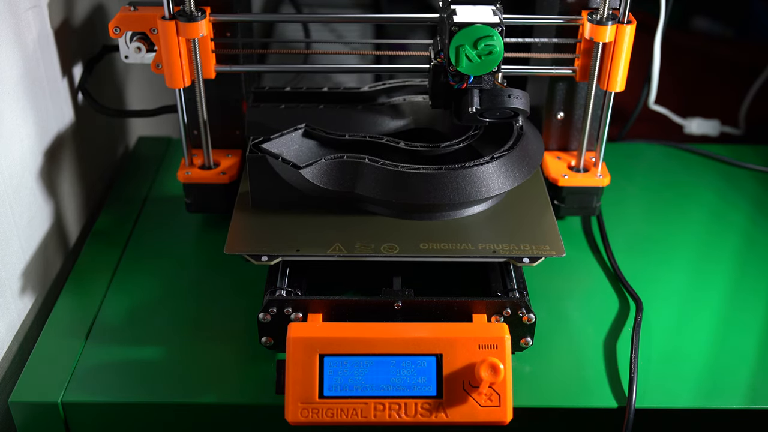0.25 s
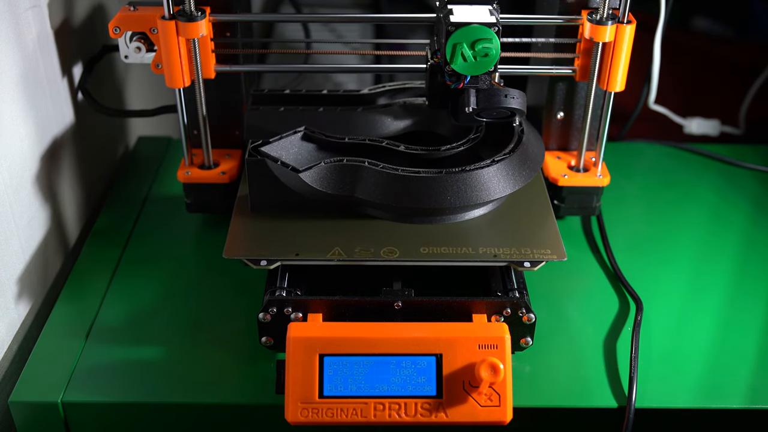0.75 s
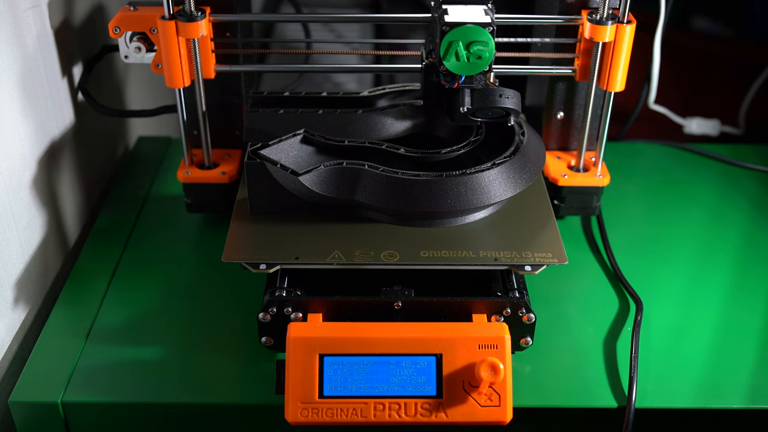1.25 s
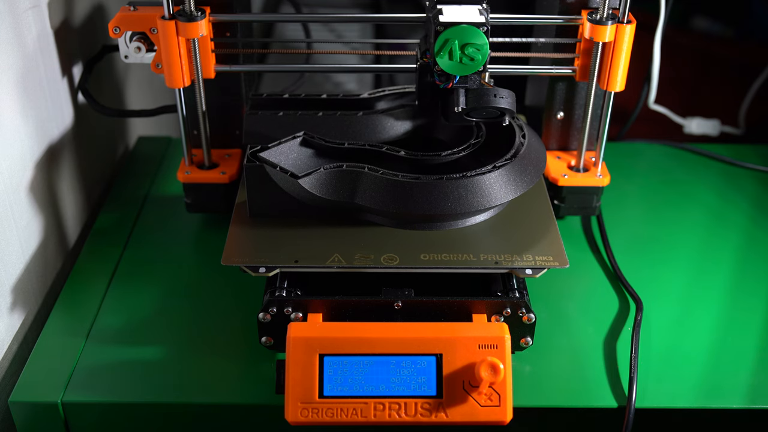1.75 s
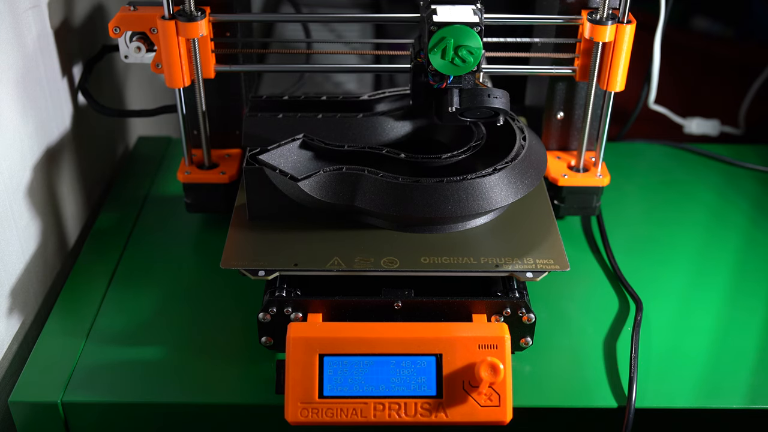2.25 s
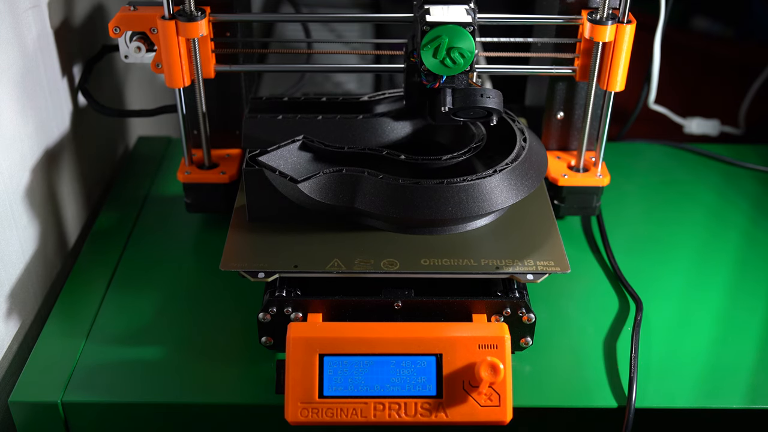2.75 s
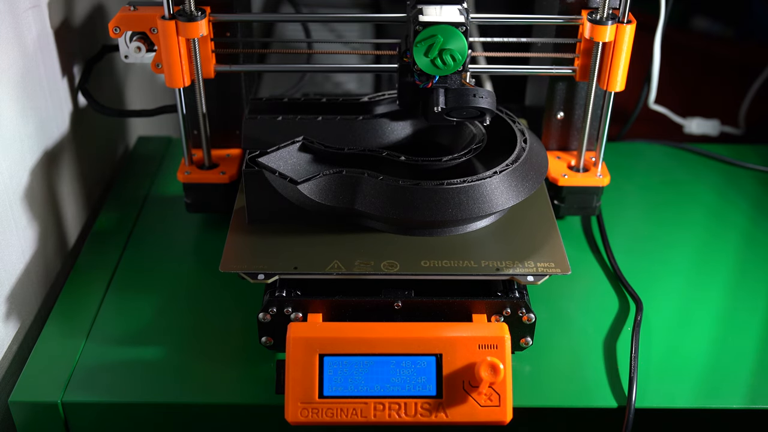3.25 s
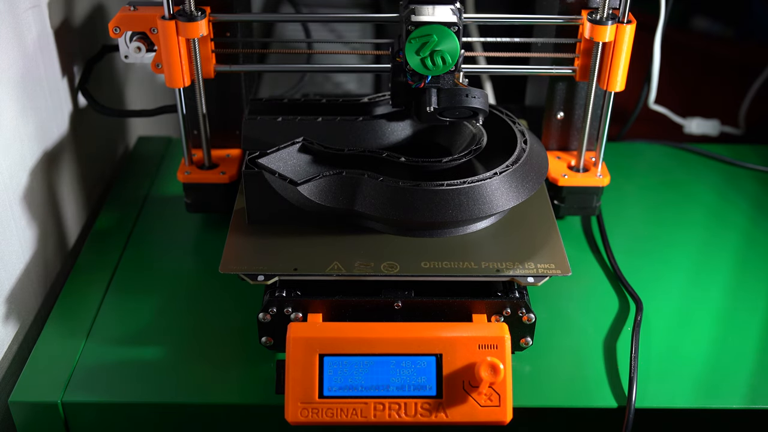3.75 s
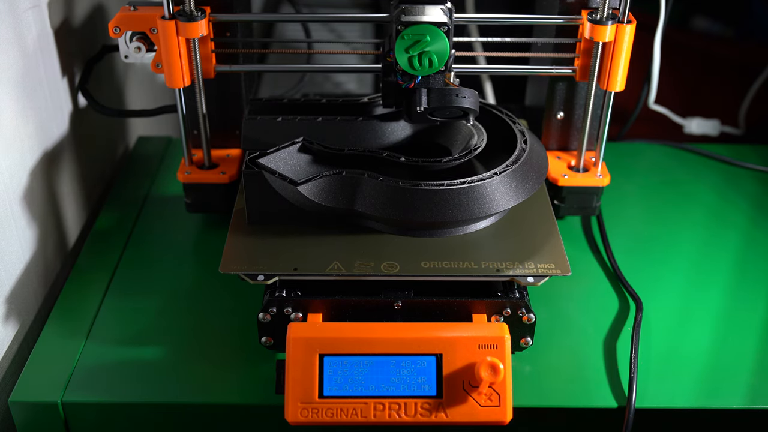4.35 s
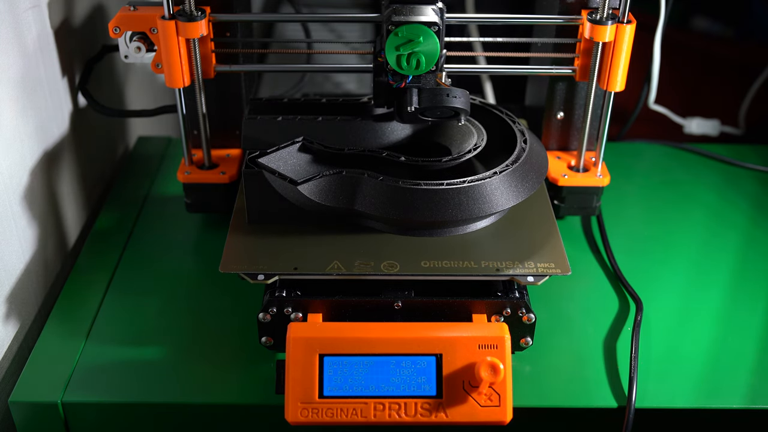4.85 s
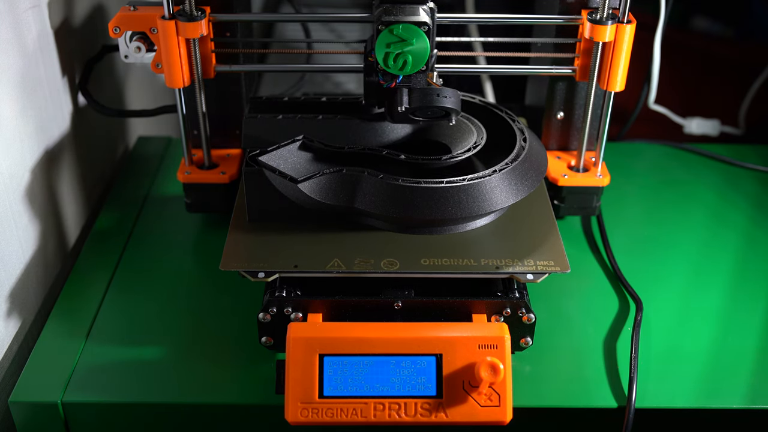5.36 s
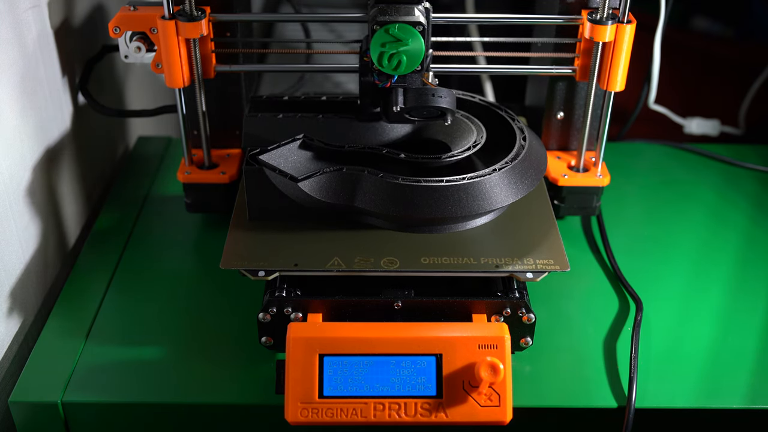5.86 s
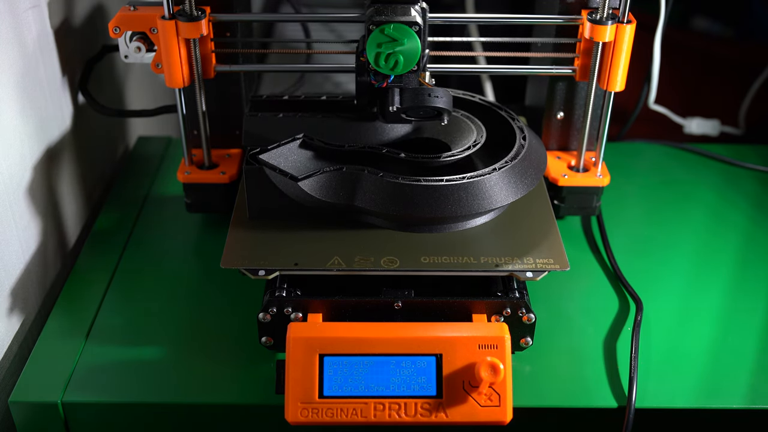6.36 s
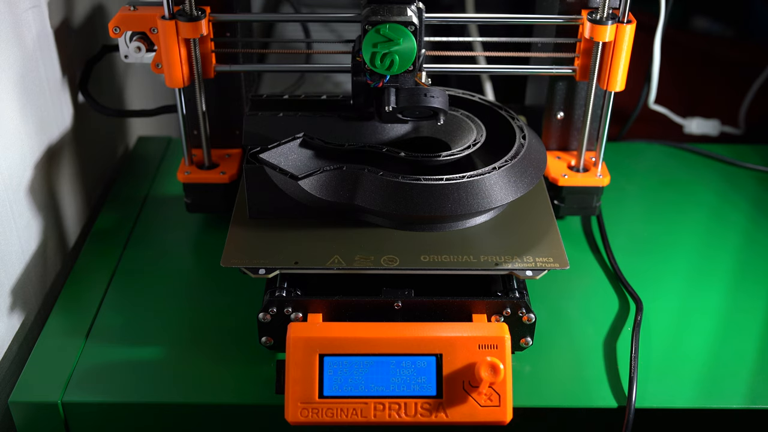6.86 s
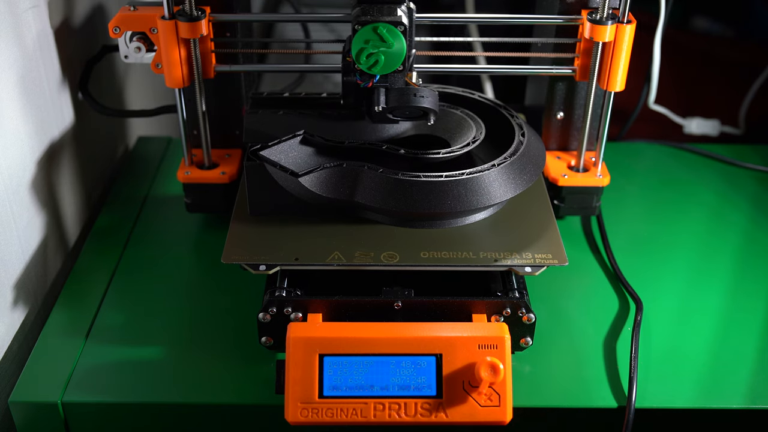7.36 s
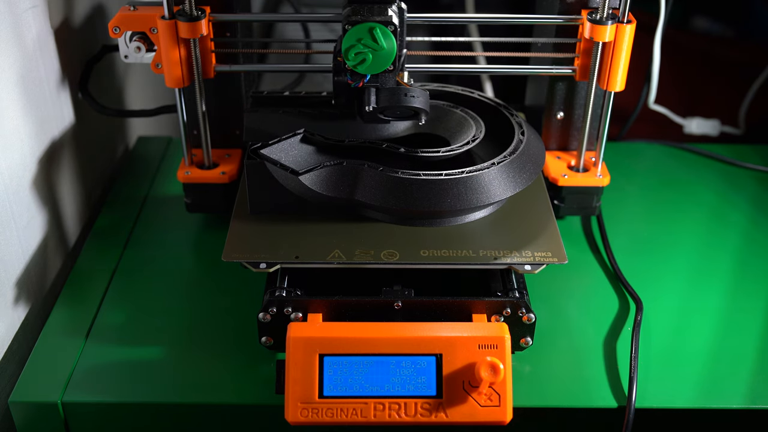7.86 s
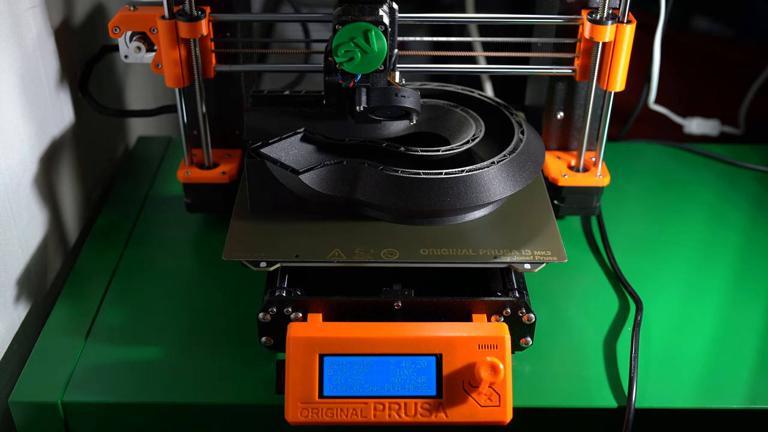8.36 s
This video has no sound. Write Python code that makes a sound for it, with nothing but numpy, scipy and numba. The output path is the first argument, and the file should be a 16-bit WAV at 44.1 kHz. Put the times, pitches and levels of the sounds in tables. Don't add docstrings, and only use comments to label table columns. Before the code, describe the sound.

A desktop 3D printer works on a table, heard very close and nearly dry from a microphone on the same surface. Rapid zigzag strokes make a fluttering buzz and whine with ticks at each turn and low booming vibration. The strokes slow, then irregular hops bring rising and falling chirps, knocks and thumps before faster zigzags resume. Small fans blow steadily beneath.

```python
import sys
import numpy as np
from scipy import signal
from scipy.fft import rfft, irfft, next_fast_len
from scipy.io import wavfile
from scipy.ndimage import uniform_filter1d
from numba import njit

SR = 44100
rng = np.random.default_rng(int(sys.argv[2]) if len(sys.argv) > 2 else 0)


def wav_out(sig):
    wavfile.write(sys.argv[1], SR, np.round(np.clip(np.atleast_2d(sig).T, -1, 1) * 32767).astype(np.int16))


def attenuation_scalar(level_db):
    decades = np.asarray(level_db, float) / 20
    return 10 ** decades


N = 379701
TIME = np.arange(N) / SR


def set_rms(x, db):
    return x * attenuation_scalar(db) / np.sqrt(np.mean(x ** 2))


def noise():
    return rng.standard_normal(N)


def curves(table):
    s, *columns = np.transpose(table)
    return [np.interp(TIME, s, column) for column in columns]


@njit
def moving_band(x, hz, width):
    y, band_state, low_state = np.empty(len(x)), 0., 0.
    for i in range(len(x)):
        g, damping = np.tan(np.pi * hz[i] / SR), width / hz[i]
        v = (band_state + g * (x[i] - low_state)) / (1 + g * (g + damping))
        band_state = 2 * v - band_state
        low_state = low_state + 2 * g * v
        y[i] = damping * v
    return y


def band(x, hz, width):
    return signal.lfilter(*signal.iirpeak(hz, hz / width, fs=SR), x)


def body(x, modes):
    return sum((-1) ** k * attenuation_scalar(db) * band(x, hz, width) for k, (hz, width, db) in enumerate(modes))


def walk(rate):
    hold = int(SR / rate)
    steps = np.repeat(rng.standard_normal(N // hold + 1), hold)
    return 1.19 * uniform_filter1d(steps, hold)[:N]


def clicks(s, size):
    out = np.zeros(N)
    i = np.maximum(np.asarray(s) * SR, 0).astype(int)
    np.add.at(out, i[i < N], np.asarray(size)[i < N])
    return out


def puffs(s, size, length):
    return signal.lfilter([1], [1, -np.exp(-1 / (length * SR))], clicks(s, size)) * noise()


def ramp(mid, half):
    return np.clip(1 - np.abs(TIME - mid) / half, 0, 1)


def bumps(events, width_s):
    return sum(db * np.exp(-((TIME - at) / width_s) ** 2) for at, db in events)


# (frequency [Hz], density [dB per Hz])
AIR = [(53, -6), (90, -20.5), (119, -5.5), (151, -21), (214, -12.5), (359, -29.5), (426, -5), (685, -89),
       (780, -73), (907, -31), (1250, -30.5), (1730, -40), (3610, -44), (7060, -52.5), (15700, -46)]
# (frequency [Hz], width [Hz], level [dB])
SHROUD = [(1373, 280, 1.5), (2560, 740, -1.5), (3566, 840, -2), (5550, 95, -27), (6070, 78, -19.5),
          (8090, 220, -17.5)]
# (frequency [Hz], width [Hz], level [dB])
BLADE_LINES = [(3390, 25, -70.5), (3853, 9.3, -66.5), (4185, 4.6, -72), (4250, 6.7, -70.5),
               (2180, 71, -62.5), (1050, 150, -63), (1197, 140, -57.5)]


def fans():
    hz, db = np.transpose(AIR)
    size = next_fast_len(N)
    f = np.maximum(np.fft.rfftfreq(size, 1 / SR), 1)
    air = irfft(rfft(noise(), size) * attenuation_scalar(np.interp(np.log(f), np.log(hz), db)), size)[:N]
    air = set_rms(air, 0) * 2.09
    shroud = body(noise() * attenuation_scalar(0.8 * walk(30)), SHROUD)
    lines = sum(set_rms(band(noise(), hz, width), db) for hz, width, db in BLADE_LINES)
    return attenuation_scalar(-44.5) * (air + set_rms(shroud, -5)) + lines


# (frequency [Hz], width [Hz], level at start [dB], level at end [dB])
TRAVEL = [(2756, 320, -53.5, -72), (2350, 230, -69, -64), (3330, 290, -71.5, -57.5), (3926, 360, -73, -60),
          (5440, 150, -71, -86), (6060, 95, -73, -79)]


def head_travel():
    out = 0
    for hz, width, start_db, end_db in TRAVEL:
        tone = band(band(noise(), hz, width), hz, width)
        out = out + attenuation_scalar(np.linspace(start_db, end_db, N)) * set_rms(tone, 0)
    return out


# (zigzag number, time for its four turns [s])
GAP_ONE = [(0, .1232), (2, .1164), (8, .1085), (13, .1038), (16, .1059), (24, .1172), (30, .1293),
           (36, .1476), (41, .163), (42, .186), (43, .199)]
# (zigzag number, time for its four turns [s])
GAP_TWO = [
    (0, .1941),
    (2, .1857),
    (3, .167),
    (8, .1577),
]
RUN_STARTS = (.0032, 7.2045)


def zigzags():
    runs = []
    for start, gap in zip(RUN_STARTS, (GAP_ONE, GAP_TWO)):
        lasts = np.interp(np.arange(gap[-1][0] + 1), *np.transpose(gap))
        runs.append(start + np.r_[0, np.cumsum(lasts)])
    return runs


def progress():
    return sum(np.interp(TIME, starts, np.arange(len(starts))) for starts in zigzags())


TURN_PLACE = [
    (-.032, .243, .472, .748),
    (-.032, .262, .512, .755),
]


def turns():
    rows = []
    for starts, places in zip(zigzags(), TURN_PLACE):
        for a, b in zip(starts, starts[1:]):
            slow = np.clip((b - a - 0.178) / 0.028, 0, 1) * (a < RUN_STARTS[1])
            rows += [(a + place * (b - a), -49 - 7 * slow, k) for k, place in enumerate(places)]
    s, tick_db, place = np.transpose(rows)
    return s, tick_db, place.astype(int)


# (time [s], half length [s], whine [dB], lowest driver hiss [Hz], driver hiss [dB])
HOPS = [(5.655, 0.054, -28.5, 11870, -40), (5.789, 0.017, -53, 13000, -35), (5.854, 0.033, -42, 13200, -40),
        (5.946, 0.052, -58, 14300, -44), (6.111, 0.054, -31.5, 12960, -40), (6.238, 0.02, -49, 12600, -40),
        (6.302, 0.035, -40, 13530, -37), (6.398, 0.033, -42, 14200, -41), (6.569, 0.055, -32.5, 12160, -42),
        (6.697, 0.022, -54, 13000, -40), (6.758, 0.02, -40, 12600, -39), (6.858, 0.017, -50, 13600, -40),
        (7, 0.036, -54, 14270, -47), (7.109, .02, -61, 12240, -42), (7.174, 0.023, -38, 13530, -42),
        (7.21, 0.021, -32.5, 14000, -44)]
# (time [s], level [dB])
DRIVER = [(0, -53.5), (1.4, -52.5), (3, -53.5), (4.6, -54.5), (5.5, -53.5), (5.7, -53), (7.1, -54.5),
          (7.3, -53), (8.61, -53)]
RESTS = [5.57, 5.74, 6.19, 6.65, 6.94, 7.07]


def driver():
    steady = 0
    for hz, width, db in ((12600, 520, -5), (13900, 400, 0), (15160, 2000, 3.5), (15450, 560, 3)):
        steady = steady + attenuation_scalar(db + 3.3 * walk(110)) * band(noise(), hz, width)
    dip, gain = np.zeros(N), np.zeros(N)
    for mid, half, _, low_hz, db in HOPS:
        speed = ramp(mid, half)
        dip = dip + (16000 - low_hz) * speed ** 3.6
        gain = gain + attenuation_scalar(db) * speed ** 0.68
    hiss, swept = noise(), 0
    for depth in (.95, .6, .3):
        hz = 16000 - depth * dip
        swept = swept + moving_band(moving_band(hiss, hz, 1800.), hz, 1800.)
    rest_db = bumps([(at, -9.5) for at in RESTS], 0.026)
    return attenuation_scalar(curves(DRIVER)[0] + rest_db) * set_rms(steady, 0.83) + 2.0 * gain * swept


def knocks(events, modes, sharp, rattle, rattle_s, soft_s):
    s, db = np.transpose(events)
    blow = clicks(s, sharp * attenuation_scalar(db)) + puffs(s - .5 * rattle_s, rattle * attenuation_scalar(db), rattle_s)
    t = TIME[:SR // 4]
    ring = sum(attenuation_scalar(db) * np.exp(-np.log(1000) * t / t60) * np.sin(2 * np.pi * hz * t) for hz, db, t60 in modes)
    return signal.fftconvolve(blow, ring * (1 - np.exp(-t / soft_s)))[:N]


# (time [s], peak [dB])
RELEASE = [(5.7107, -33.5), (6.0028, -39), (6.02, -40), (6.1678, -32), (6.4018, -43), (6.6293, -31.5),
           (7.041, -35)]
# (frequency [Hz], level [dB], t60 [s])
RELEASE_MODES = [(1280, 2.5, 0.025), (1517, -8, 0.053), (1579, -9, 0.03), (1084, -10, 0.072),
                 (1930, -8, 0.027), (2600, -18, .008), (3620, -1.5, 0.011)]


def filament_release():
    return knocks(RELEASE, RELEASE_MODES, sharp=1.3, rattle=0.044, rattle_s=0.0032, soft_s=0.00021)


# (time [s], peak [dB])
GRIP = [(5.802, -34), (6.263, -28), (6.722, -30), (7.136, -28.5)]
# (frequency [Hz], level [dB], t60 [s])
GRIP_MODES = [(2496, -4.5, 0.08), (2590, -7, 0.044), (2230, -3, 0.036), (2080, 0, 0.02), (1330, -8, 0.05),
              (2930, -5, 0.023), (3540, 0, 0.017)]


def filament_grip():
    return knocks(GRIP, GRIP_MODES, sharp=1.6, rattle=0.034, rattle_s=0.0082, soft_s=0.0044)


# (frequency [Hz], width [Hz], level [dB])
BEARINGS = [(2710, 1500, -5), (2604, 477, 9.5), (4080, 250, -0.5), (5730, 380, -0.5), (5860, 290, 0),
            (7680, 960, -3), (8900, 3900, -5.5), (11050, 3600, -6.5)]


def bearing_ticks():
    s, tick_db, _ = turns()
    size = attenuation_scalar(tick_db + 16.5 + 1.4 * rng.standard_normal(len(s)))
    tick = 0.87 * puffs(s - .001, size, 0.0023) + 0.72 * clicks(s, size)
    shiver = puffs(s - .001, size, 0.008)
    return body(tick, BEARINGS[2:]) + 0.6 * body(shiver, BEARINGS[:2])


# (time [s], peak [dB], length [s])
SCUFFS = [(2.6329, -27, 0.0062), (2.677, -27.5, 0.007), (3.743, -32, 0.005), (5.44, -36, 0.0067),
          (5.807, -30.5, 0.0063), (5.914, -41, 0.005), (6.26, -31, 0.011), (6.37, -36, 0.0041),
          (6.725, -31, 0.005), (6.826, -41, 0.0081), (7.14, -29.5, 0.0057)]


def nozzle_scuffs():
    scrape, out = band(noise(), 4300, 8800), 0
    for at, db, length in SCUFFS:
        age = np.maximum(TIME - at, 0) / max(length, .001)
        out = out + attenuation_scalar(db - 5.0) * np.sqrt(age) * np.exp(-age) * scrape
    ping = np.exp(-((TIME - 2.636) / 0.0013) ** 2) * np.sin(2 * np.pi * 3950 * TIME)
    return out + attenuation_scalar(-35) * ping


# (frequency [Hz], width [Hz], level [dB])
FRAME = [(301, 29.3, 0.5), (338.8, 25.6, 3), (419.4, 39, 2), (490.7, 57.6, -3.5), (597.5, 123, -7.5),
         (662, 304, -12), (774.6, 54, -10.5), (1053, 106, -19), (1353, 300, -21.5)]


def whine(step_hz, gain):
    phase = 2 * np.pi * np.cumsum(step_hz * (1 + 0.0402 * walk(150))) / SR
    tone = gain * (np.sin(phase) + 0.58 * np.sin(2 * phase) + 0.32 * np.sin(3 * phase))
    plate = band(band(tone, 784, 32), 784, 160)
    return body(tone, FRAME) + attenuation_scalar(-9) * plate


# (time [s], bed motor share [0-1], whine over buzz [dB], step rate at mid stroke [Hz])
STROKES = [(0, 0.55, -10.5, 430), (.55, 0.44, -9, 431), (.9, 0.41, -12, 446.6), (1.25, 0.46, -12.5, 480.5),
           (1.7, 0.54, -0.5, 558), (2.3, 0.7, 1, 545.7), (2.6, 0.44, -6.5, 478.6), (3.1, 0.13, -13, 449.7),
           (3.6, 0.11, -13, 423), (4.3, 0.55, -10.5, 419.4), (4.9, 0.16, -15, 426.6), (5.4, 0.2, -6, 444.6),
           (7.2, 0.07, -5, 500), (7.6, 0.23, -4, 523.7), (8.0, 0.49, -6, 471.7), (8.61, 0.4, -19.5, 455)]


def long_strokes():
    _, whine_db, top_hz = curves(STROKES)
    count = progress()
    speed = np.clip(1 - np.abs((2 * count + .36) % 1 - .5) / .4, 0, 1) * (np.gradient(count) > 0)
    return whine(top_hz * speed ** .7, attenuation_scalar(whine_db + 1.5 * walk(18)) * speed ** .8)


# (time [s], half length [s], top step rate [Hz], whine [dB])
SLOW_STROKES = [(5.238, 0.033, 427, -27.5), (5.345, 0.044, 482.4, -30.5), (5.503, 0.037, 476, -30.5),
                (5.898, 0.016, 426.7, -34.5), (6.007, .03, 370.1, -32.5), (6.178, 0.037, 399, -39),
                (6.5, .03, 399.5, -34.5), (6.64, .03, 342, -35), (6.808, 0.016, 448.7, -32),
                (7.342, .025, 441.5, -33), (7.41, .035, 500, -31), (7.519, 0.033, 477, -29.5),
                (7.6, 0.029, 480, -34)]


def slow_strokes():
    hz, gain = np.zeros(N), np.zeros(N)
    for mid, half, top_hz, db in SLOW_STROKES:
        speed = ramp(mid, half)
        hz = hz + top_hz * speed ** .25
        gain = gain + attenuation_scalar(db + 6) * speed ** 1.2
    return whine(hz, gain)


def hop_moves():
    hz, gain = np.zeros(N), np.zeros(N)
    for mid, half, db, *_ in HOPS:
        speed = ramp(mid, half)
        hz = hz + max(9500 * half, 310) * speed ** 0.4
        gain = gain + attenuation_scalar(db + 5.5) * np.sqrt(speed)
    return hz, gain


# (time [s], frame level [dB], base level [dB])
BUZZ = [(0, -36, -36.5), (.5, -37, -37.5), (.62, -32.5, -31.5), (.96, -36.5, -40.5), (1.36, -35, -30),
        (1.5, -33.5, -37), (1.9, -26, -30.5), (2.3, -26.5, -39), (2.54, -30.5, -30), (2.61, -40.5, -45),
        (2.71, -31, -37), (2.95, -33.5, -37.5), (3.14, -39, -43.5), (5.04, -37.5, -38.5), (5.5, -35, -34),
        (7.12, -34.5, -36.5), (7.35, -29.5, -36), (8.61, -41, -40.5)]
# (frequency [Hz], width [Hz], level [dB])
BASE = [(199.4, 9.7, -6.5), (245.6, 16.3, -4)]


def motors():
    frame_db, base_db = curves(BUZZ)
    whine_db = curves(STROKES)[1]
    s = turns()[0]
    jolts = puffs(s, 1.76 * attenuation_scalar(3.6 * rng.standard_normal(len(s))), 0.005)
    belts = attenuation_scalar(1.36 * walk(40)) * noise() + jolts
    in_frame, in_base = body(belts, FRAME), body(belts, BASE)
    out = attenuation_scalar(frame_db) * (2.72 * long_strokes() + attenuation_scalar(-.6 * whine_db) * set_rms(in_frame, -7.5))
    out = out + attenuation_scalar(base_db) * set_rms(in_base, -2.5)
    rattle = attenuation_scalar(-3) * set_rms(in_frame, -5) + attenuation_scalar(-9.5) * set_rms(in_base, -13)
    rattle = rattle + set_rms(band(band(belts, 1130, 580), 1120, 776), -16)
    hop_hz, hop_gain = hop_moves()
    rattle = uniform_filter1d(hop_gain, int(0.057 * SR)) * rattle
    return out + slow_strokes() + whine(hop_hz, hop_gain) + rattle


HEAD_PULL = (0.56, 0.77, 0.51, 0.53)
BED_PULL = (0.0049, -0.97, 0.12, -0.56)
# (time [s], jolt [share of a motor's pull])
EVEN = [(0, -0.18), (2.2, 0.2), (2.6, -0.13), (3.6, -0.61), (4.3, -0.64), (5.4, -0.6), (7.2, -0.3),
        (8.0, -0.59), (8.61, 0.54)]
# (frequency [Hz], width [Hz], level [dB])
TABLE = [(51.35, 12.5, 2), (59.2, 16.5, 1.5), (69.5, 8.16, -3)]
# (time [s], boom [dB], throb once a zigzag [dB]: above 0 at its start, below 0 at its middle)
SHAKE = [(0, -15, 11.5), (.5, -14.5, 1.5), (.75, -19.5, 2), (1.2, -17, -0.5), (1.3, -12, 2),
         (2.28, -15, -2), (2.4, -18.5, 1.5), (2.8, -15.5, 0), (3.3, -20.5, 2), (3.45, -19, 1.5),
         (3.7, -18, -2), (4.1, -19, 0.5), (4.5, -17.5, -1), (4.75, -16.5, -1.5), (5.45, -22, -2),
         (7.15, -19, -2), (7.5, -19.5, 3.5), (8.61, -15.5, 1)]
# (time [s], change [dB])
LURCHES = [(.58, -8), (0.838, 2.5), (1.19, -6), (1.89, 4.5), (2.269, 3), (2.59, -7), (2.8, 3), (3.06, 6.5),
           (3.32, -2), (3.43, 8.5), (4.2, 6), (4.57, 1), (4.9, 3.5), (5.131, -5.5), (5.57, 7), (5.69, 7),
           (5.93, 9.5), (6.19, 7), (6.499, 12.5), (6.6, 3.5), (6.932, 12.5), (7.0, 5), (7.25, 4),
           (7.39, 6.5), (7.7, 2.5), (8.06, -3.5), (8.442, 2.5)]


def table_boom():
    s, _, place = turns()
    bed = np.clip(np.interp(s, TIME, curves(STROKES)[0]), 0, 1)
    motor_pull = (1 - bed) * np.array(HEAD_PULL)[place] + bed * np.array(BED_PULL)[place]
    pull = motor_pull + np.interp(s, *np.transpose(EVEN))
    lagged = s + .0335
    push = clicks(lagged, pull + .05 * rng.standard_normal(len(s)))
    push = push + clicks([0], [-1.3])
    uneven = clicks(lagged, motor_pull)
    hops = sum(clicks([mid - half, mid, mid + half], [.6, -.9, .6])
               for mid, half, *_ in SLOW_STROKES[:3] + HOPS)
    boom = band(body(push + hops + .004 * noise(), TABLE), 60.1, 29.7)
    slow = np.sqrt(uniform_filter1d(boom ** 2, int(0.1205 * SR), mode="reflect") + 1e-9)
    boom_db, throb_db = curves(SHAKE)
    boom_db = boom_db + throb_db * np.cos(2 * np.pi * (progress() - .08)) + bumps(LURCHES, 0.037)
    sway = set_rms(band(band(uneven + .5 * hops, 43.5, 16), 35.0, 15), -33)
    sway = sway + 0.35 * np.exp(-TIME / 0.0021)
    panel = set_rms(band(band(hops, 110.0, 42), 113, 39), -49.5)
    return attenuation_scalar(boom_db) * boom / slow + sway + panel


def room(near):
    t = TIME[:SR // 4]
    tail = rng.standard_normal(len(t)) * np.exp(-np.log(1000) * t / 0.26) * (t > .004)
    return signal.fftconvolve(near, attenuation_scalar(-44) * tail)[:N]


def scene():
    near = filament_release() + filament_grip() + bearing_ticks() + nozzle_scuffs() + motors()
    return (fans() + head_travel() + driver() + near + room(near) + table_boom())[None]


def roll_off(x):
    return signal.sosfilt(signal.butter(12, 15740, fs=SR, output="sos"), x)


def record(dry):
    steep = signal.ellip(10, .2, 70, 15720, fs=SR, output="sos")
    mix = signal.sosfilt(steep, dry)
    return roll_off(mix)


dry = scene()
out = record(dry)
wav_out(out)
```